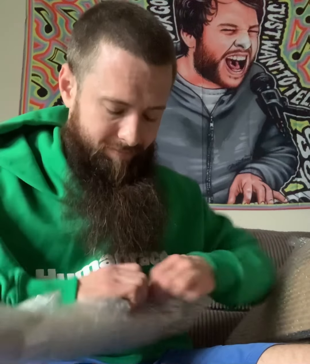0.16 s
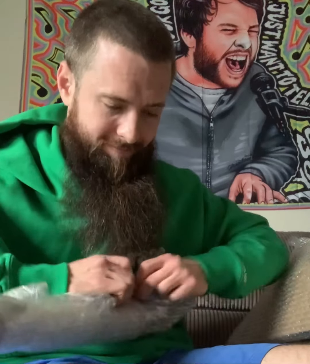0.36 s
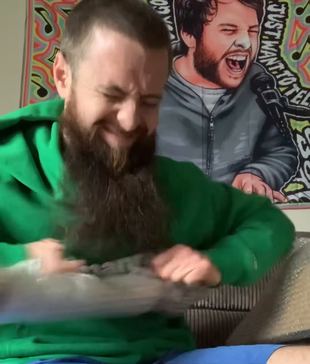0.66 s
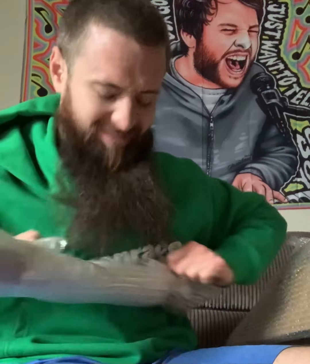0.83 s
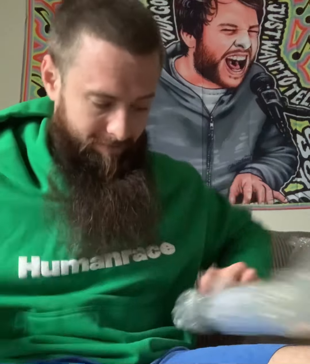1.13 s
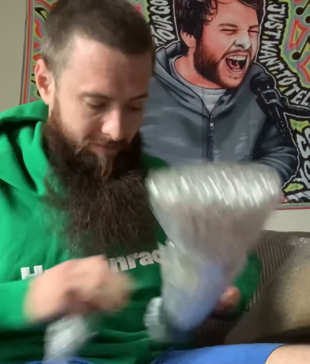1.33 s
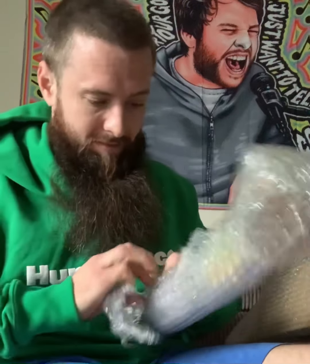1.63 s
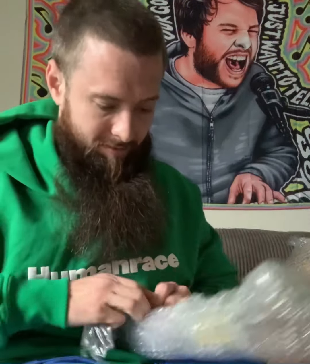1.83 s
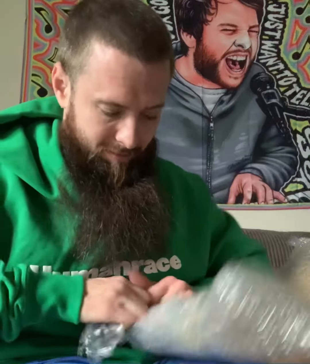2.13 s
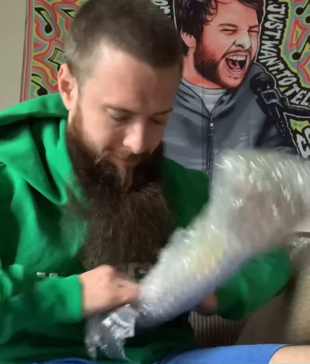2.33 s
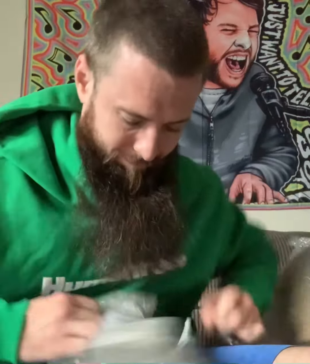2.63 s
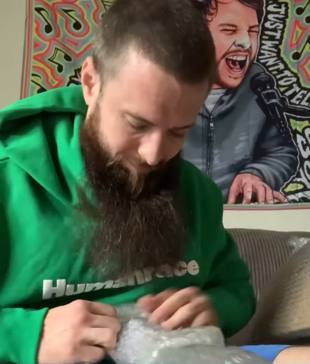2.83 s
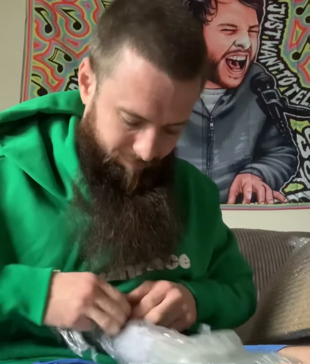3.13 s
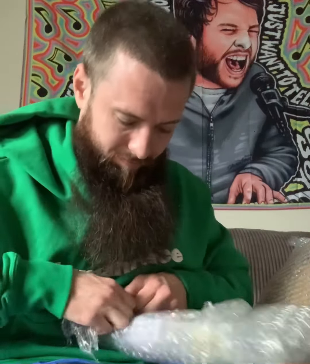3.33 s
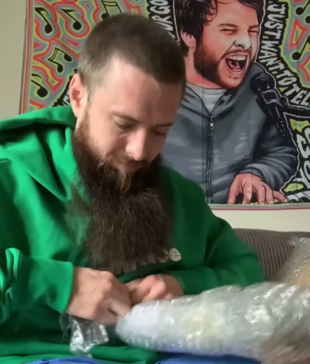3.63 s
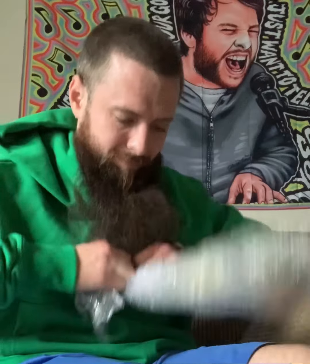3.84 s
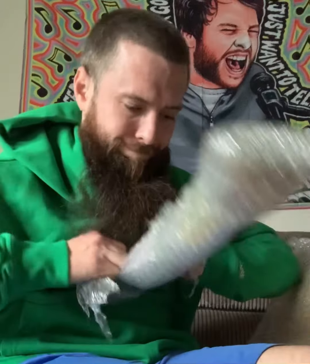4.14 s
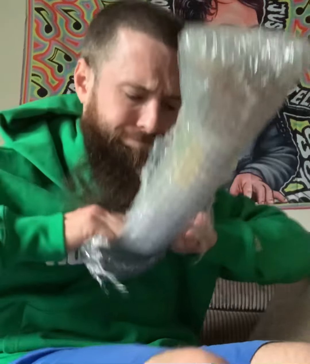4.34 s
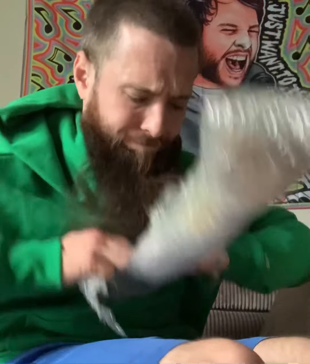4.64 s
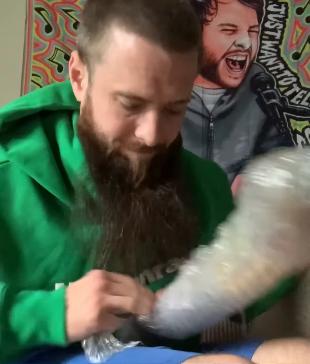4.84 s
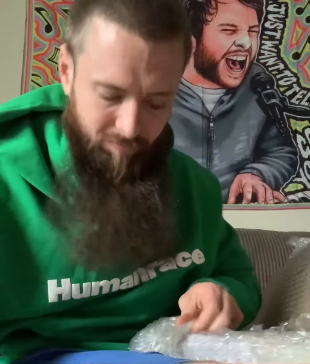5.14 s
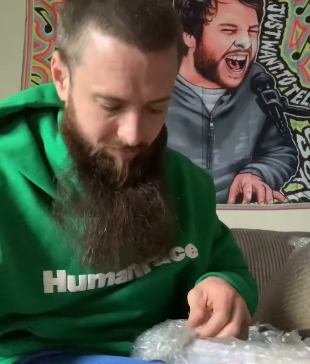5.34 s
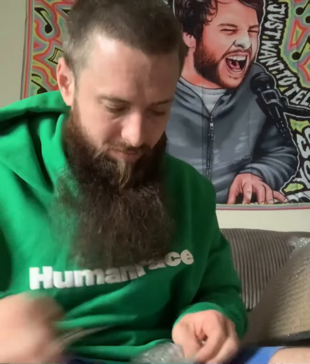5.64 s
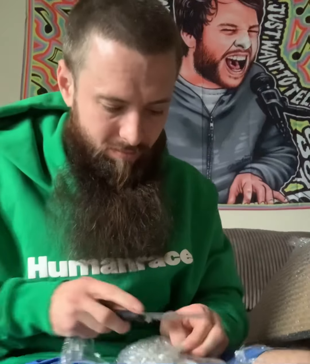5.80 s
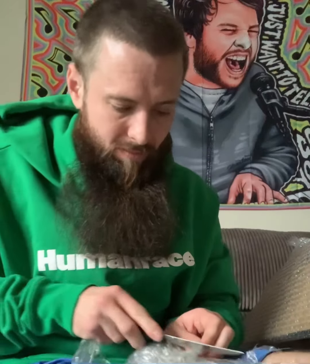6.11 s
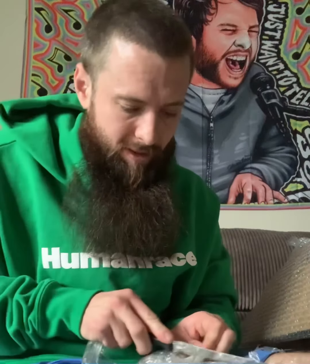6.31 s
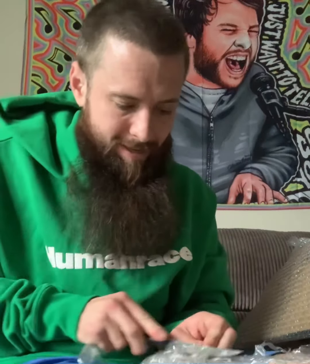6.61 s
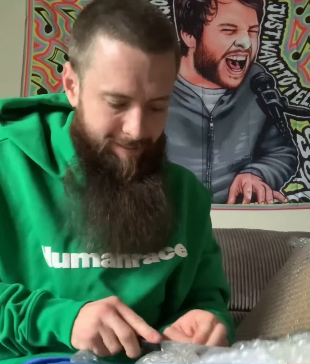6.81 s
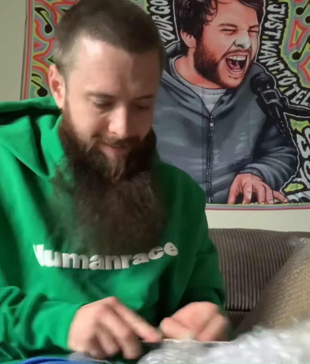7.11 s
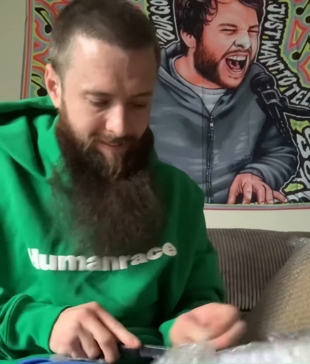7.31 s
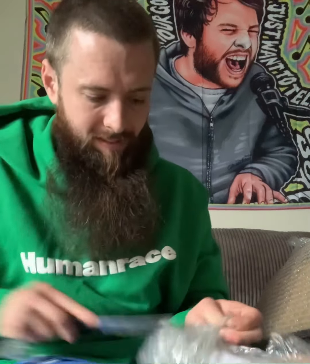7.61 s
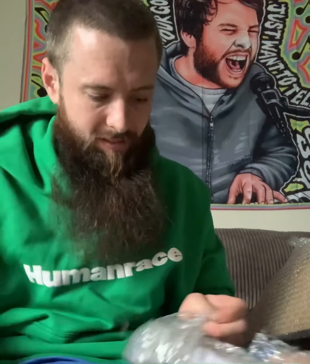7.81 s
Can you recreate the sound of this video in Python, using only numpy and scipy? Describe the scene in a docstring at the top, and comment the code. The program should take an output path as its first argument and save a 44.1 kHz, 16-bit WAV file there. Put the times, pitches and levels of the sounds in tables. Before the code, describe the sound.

Bursts of bright plastic crackling, tape squeals and pops in a small living room, a quieter lull, a hard knock, then short rasping cutting strokes.

```python
"""Bubble wrap is tugged off a parcel on a sofa in a small living room, in front of a phone's microphone.
Tape squeals as it sticks and slips, film crackles in random grains, sharp cracks are filtered noise bursts,
and hollow pops are falling chirps, from the buckling sheet or a scraping stroke. Cushions thud as sines.
A knife knocks on a table, heard as ringing modes, and saws through the wrap in short rasping strokes.
The room answers from about a metre of extra path, over a low rumble and faint hums."""
import sys
import numpy as np
from scipy import signal
from scipy.fft import rfft, irfft, next_fast_len
from scipy.io import wavfile
from scipy.ndimage import uniform_filter1d, map_coordinates

SR = 44100
rng = np.random.default_rng(int(sys.argv[2]) if len(sys.argv) > 2 else 0)


def dump(signal):
    """Clip the signal to [-1, 1] and save it as 16-bit WAV at the path in sys.argv[1]."""
    limited = np.clip(np.atleast_2d(signal).T, -1, 1)
    pcm = np.round(limited * 32767).astype(np.int16)
    wavfile.write(sys.argv[1], SR, pcm)


N = 351036  # samples
TOP_HZ = 15800  # the phone keeps nothing above this


def amp(db):
    """Decibels to gain."""
    return 10 ** (np.asarray(db) / 20)


def unit(x):
    """x scaled to rms 1."""
    return x / np.sqrt(np.mean(x ** 2) + 1e-20)


def along(points, hz):
    """(Hz, value) points read on a log axis of frequency."""
    f, v = np.transpose(points)
    return np.interp(np.log(hz + 1), np.log(f + 1), v)


def hump(hz, centre_hz, octaves):
    """A bell curve of height 1 on a log axis of frequency."""
    return np.exp(-.5 * (np.log2((hz + 1) / centre_hz) / octaves) ** 2)


def curves(rows):
    """One value per sample for each column after the time."""
    s, *cols = np.transpose(rows)
    return [np.interp(np.arange(N) / SR, s, c) for c in cols]


def wobble(rate):
    """A smooth random curve, rate knots a second."""
    knots = rng.standard_normal(int(N * rate / SR) + 4)
    return map_coordinates(knots, [np.arange(N) * rate / SR])


def filtered(x, response):
    """x times a complex response of frequency."""
    n = x.shape[-1]
    m = next_fast_len(n + SR // 8)
    return irfft(rfft(x, m) * response(np.fft.rfftfreq(m, 1 / SR)), m)[..., :n]


def coloured(x, spectrum):
    """x shaped by the given spectrum, at rms 1."""
    return unit(filtered(x, lambda hz: amp(along(spectrum, hz))))


def add(track, s, sound):
    """Mix a sound into the track from time s."""
    start = max(round(s * SR), 0)
    track[start:start + len(sound)] += sound[:N - start]


def bending(hz, lag=.0048):
    """Bending waves arrive treble first: the delay is lag (s) at 1 kHz and falls with the root of frequency."""
    return np.exp(-4j * np.pi * lag * np.sqrt(10 ** 3 * hz))


def grains(rate, spread_db, limit):
    """Impulses at random moments, rate a second: many tiny ones, a few large."""
    when, chance, sign = rng.random((int(rate * N / SR), 3)).T
    rarity = np.minimum(-np.log(1 - chance), limit)
    size = amp(spread_db * rarity) * np.sign(sign - .5)
    return np.bincount((when * N).astype(int), size, N)


# colour of the low rumble under the room: [f/Hz, density/dB per Hz]
RUMBLE_COLOUR = [(20, -38), (42, -18), (62, -3.5), (80, -0.5), (105, -7), (140, -13.5), (300, -15),
                 (1000, -28), (4000, -62), (15000, -31.5)]
# low hums that come and go: [t/s, length/s, f/Hz, level/dB]
HUMS = [(3.197, 1.05, 104.2, -57), (5.5, 2.36, 78.3, -53)]
RUMBLE_DB = -54


def background():
    """Noise makes a low rumble; sines that waver in phase and level hum faintly in it."""
    out = amp(RUMBLE_DB) * coloured(rng.standard_normal(N), RUMBLE_COLOUR)
    for s, length, hz, db in HUMS:
        t = np.arange(int(length * SR)) / SR
        tone = np.sin(2 * np.pi * hz * t + wobble(10)[:len(t)])
        hum = tone * amp(3 * wobble(7)[:len(t)])
        add(out, s, amp(db + 1.5) * unit(hum) * signal.windows.tukey(len(t)))
    return out


# rustle of the wrap as it is held and turned: [t/s, level/dB]
HANDLING = [(0.76, -40.5), (1.18, -49.5), (1.36, -44.5), (1.58, -42.5), (2.36, -43.5), (2.72, -47),
            (3.08, -45.5), (3.23, -47), (4.65, -50), (4.83, -47), (5.99, -52.5), (7.0, -45.5), (7.18, -40),
            (7.46, -38.5), (7.7, -46), (7.96, -54.5)]
# the hands grip and tug the wrap: [t/s at the hardest, length/s, film level/dB, padded sheet level/dB]
TUGS = [(0.08, 0.28, -30, -49), (0.247, 0.04, -31.5, -55), (0.377, 0.19, -37, -44), (0.56, 0.17, -26, -38),
        (0.645, 0.093, -24.5, -29), (0.869, 0.11, -30.5, -32.5), (0.997, 0.23, -41, -48.5),
        (1.652, 0.14, -41, -47), (2.043, 0.049, -31.5, -40.5), (2.108, 0.056, -33, -64),
        (2.369, 0.19, -32, -41), (2.889, 0.073, -34.5, -44), (3.005, 0.11, -40, -68),
        (3.163, 0.2, -41, -53), (3.838, 0.23, -42, -60), (4.247, 0.14, -44.5, -74),
        (4.857, 0.19, -41, -54.5), (5.078, 0.12, -43, -58), (6.276, 0.094, -46, -74),
        (6.498, 0.085, -39.5, -59), (6.745, 0.034, -36, -66), (7.52, 0.11, -29.5, -58)]
HELD_FILM_DB, HELD_SHEET_DB = 1.5, -12  # film and padded sheet, relative to the held rustle
BUILD_SHARE = 0.55  # part of a tug spent tightening
TUG_FADE_DB, TUG_SHAPE = 8.5, 2.1  # drop at both ends of a tug; roundness of its top


def effort():
    """Gain of film and padded sheet: each tug tightens and lets go, its power added to the steady handling."""
    t = np.arange(N) / SR
    held_db, = curves(HANDLING)
    power = amp([held_db + HELD_FILM_DB, held_db + HELD_SHEET_DB]) ** 2
    for s, length, film_db, sheet_db in TUGS:
        near = np.abs(t - s) < 2 * length
        before = (s - t[near]) / BUILD_SHARE
        after = (t[near] - s) / (1 - BUILD_SHARE)
        away = np.maximum(before, after) / length
        tug = amp([[film_db], [sheet_db]]) * amp(-TUG_FADE_DB * away ** TUG_SHAPE)
        power[:, near] += tug ** 2
    return np.sqrt(power)


# colour of the thin film, for crackle and sharp cracks: [f/Hz, density/dB per Hz]
FILM_COLOUR = [(200, -15), (600, -2.5), (1300, -2.5), (2100, -5.5), (3000, -1), (3900, 2), (5200, -2),
               (7200, 1), (9500, -0.5), (12000, 3.5), (15500, 0)]


def crackle(rate, spread_db, limit, variety_db=4.0):
    """Tiny creases give way as random impulses, coloured afresh from moment to moment."""
    z = signal.stft(grains(rate, spread_db, limit), nperseg=256)[2]
    facets = unit(uniform_filter1d(rng.standard_normal(z.shape), size=9, axis=0))
    varied = signal.istft(z * amp(variety_db * facets), nperseg=256)[1][:N]
    return coloured(varied, FILM_COLOUR)


# colour of the padded sheet as it flexes: [f/Hz, density/dB per Hz]
SHEET_COLOUR = [(50, -40), (150, -9), (260, 0), (480, 2), (750, -17), (1300, -8), (2500, -12), (6000, -57)]


def crinkle(film_gain, sheet_gain):
    """The film crackles in clumps as the hands work it, and the padded sheet flexes under it."""
    clumps = amp(2.77 * wobble(45))
    film = unit(crackle(rate=2100, spread_db=1.5, limit=5.1) * clumps)
    flexing = filtered(grains(rate=450, spread_db=3.5, limit=3.0), bending)
    sheet = coloured(flexing, SHEET_COLOUR)
    return amp(1.5) * film_gain * film + amp(-0.5) * sheet_gain * sheet


# tape and film squeal as they stick and slip:
# [t/s, length/s, start f/Hz, middle f/Hz, end f/Hz, level/dB before the rounded envelope, roughness 0-1]
SQUEAKS = [(0.0, 0.057, 1573, 879, 1420, -33, 0.15), (0.025, 0.041, 3013, 3463, 4210, -28, 0.55),
           (.075, 0.024, 1124, 1530, 2240, -28, 0.04), (.077, .02, 2560, 3290, 3880, -24, 0.08),
           (0.09, 0.045, 2130, 2287, 2200, -27.5, 0.02), (0.106, 0.017, 4035, 3970, 4800, -21.5, 0.2),
           (0.107, 0.032, 7400, 6480, 5680, -24, .14), (.117, 0.0147, 1540, 1676, 1520, -27.5, 0.2),
           (.121, .01, 3480, 3270, 3170, -25, .05), (1.3779, 0.0076, 3830, 3730, 3570, -25, 0),
           (4.198, .025, 3890, 4400, 5140, -41, 0.06), (7.537, 0.015, 8250, 8800, 9800, -17.5, 0.26)]


def squeaks(jitter=0.187, overtone_db=-11):
    """Stick and slip at a rate that glides along an arc; roughness shakes both pitch and level."""
    out = np.zeros(N)
    for s, length, start_hz, middle_hz, end_hz, db, rough in SQUEAKS:
        u = np.linspace(0, 1, int(length * SR))
        arc = np.polyval(np.polyfit([0, .5, 1], [start_hz, middle_hz, end_hz], 2), u)
        shake = unit(uniform_filter1d(rng.standard_normal(SR // 10), size=14))[:len(u)]
        unrest = np.sqrt(abs(rough)) * shake
        phase = 2 * np.pi * np.cumsum(arc * (1 + jitter * unrest)) / SR
        overtone = amp(overtone_db) * np.sin(2 * phase) * (2 * end_hz < TOP_HZ)
        tone = np.sin(phase) + overtone
        envelope = np.sqrt(np.abs(np.sin(np.pi * u)))
        add(out, s, amp(db) * unit(tone * (1 + unrest)) * envelope)
    return out


# lowest and highest ring of the small creases: [f/Hz]
TICK_HZ = (2200, 9000)
TICKS_PER_S, TICK_DB = 22, 5  # how often; level over the film's gain


def ticks(film_gain):
    """Small creases give way by chance, as strong as the film is worked: rows [t/s, level/dB, ring f/Hz]."""
    when, pitch = rng.random((int(TICKS_PER_S * N / SR), 2)).T
    db = 20 * np.log10(film_gain[(when * N).astype(int)]) + TICK_DB
    low_hz, high_hz = TICK_HZ
    return np.c_[when * N / SR, db, low_hz * (high_hz / low_hz) ** pitch]


# sharp cracks: creases of the film, from 5.36 s also the knife's knock, ticks and catches:
# [t/s, nominal peak level/dB, ring f/Hz]
CRACKS = [(.334, -17.5, 3450), (.405, -20.5, 3670), (.441, -21, 9000), (.4545, -8.5, 6840),
          (.4555, -17.5, 3120), (.4708, -16, 3630), (.488, -17.5, 4300), (.505, -14, 4450),
          (.512, -20, 7500), (.5618, -9.5, 3280), (.565, -10, 8850), (.5715, -13.5, 2750),
          (.647, -12, 1290), (.666, -9.5, 1300), (.8051, -9.5, 7200), (.8084, -12, 3400),
          (.8607, -13, 2550), (.898, -20, 7100), (1.0061, -23.5, 9600), (1.383, -16.5, 1950),
          (1.394, -21, 3040), (1.5694, -22.5, 3060), (1.723, -23, 3600), (1.7738, -11.5, 3630),
          (1.7825, -34, 3750), (1.7905, -19.5, 3500), (2.0346, -23, 8000), (2.054, -19.5, 9300),
          (2.2444, -23.5, 7200), (2.3105, -16.5, 2940), (2.334, -14, 4100), (2.357, -15, 4270),
          (2.368, -20, 3600), (2.3815, -13.5, 6300), (2.406, -19.5, 4320), (2.5012, -27.5, 3100),
          (2.6781, -14.5, 4100), (2.8453, -25, 1450), (2.8642, -19, 1350), (2.866, -22, 3400),
          (2.883, -23.5, 3280), (3.201, -22.5, 9200), (4.2803, -29, 3550), (4.7037, -26, 7600),
          (4.873, -27.5, 4100), (4.9013, -30, 7030), (5.3605, -24.5, 3180), (5.6401, -28.5, 4530),
          (6.652, -28, 4000), (6.8059, -28, 4100), (6.9696, -22.5, 3940), (6.9871, -20.5, 3920),
          (7.2015, -26, 3590), (7.2545, -21, 3320), (7.4261, -16, 3870), (7.4815, -18, 4230),
          (7.498, -19, 8300), (7.507, -18, 9000)]
RING_DB, RING_OCTAVES = 11, .2  # lift and width of a crack's ring
RING_OVERTONE = .35  # share of that lift an octave higher
CREEP_DB, CREEP_S, CRACK_S = -20, .025, .008  # creep level; s per 60 dB of its rise; t60 of the crack


def cracks(rows, variety_db=2.5, flutter_db=-17, flutter_t60=0.068):
    """Noise creeps up, cracks, then flutters briefly around its own pitch, as a loaded crease gives way."""
    out, t = np.zeros(N), np.arange(-SR // 50, SR // 20) / SR
    after = np.maximum(t, 0)
    creep = amp(CREEP_DB - 60 * np.abs(t) / CREEP_S)
    crack = amp(-60 * after / CRACK_S)
    flutter = amp(flutter_db - 60 * after / flutter_t60)
    shape = np.where(t < 0, creep, crack + flutter)
    for s, db, ring_hz in rows:
        # every crack has its own uneven colour
        facets = np.c_[np.geomspace(500, TOP_HZ, num=20), rng.normal(0, variety_db, size=20)]

        def colour(hz):
            """Gain of this crack: the film, its facets and its ring."""
            ring = hump(hz, ring_hz, RING_OCTAVES)
            octave = RING_OVERTONE * hump(hz, 2 * ring_hz, RING_OCTAVES)
            return amp(along(FILM_COLOUR, hz) + along(facets, hz) + RING_DB * (ring + octave))

        burst = filtered(rng.standard_normal(len(t)) * shape, colour)
        add(out, s + t[0] + .0008, amp(db - 17.5) * unit(burst))
    return out


# hollow pops: the padded sheet buckles, or a scraping stroke catches in it:
# [t/s, nominal peak level/dB, f/Hz]
POPS = [(.126, -28.5, 460), (.523, -18, 440), (.561, -21.5, 374), (.567, -14, 325), (.63, -18.5, 440),
        (0.6638, -17.5, 467), (0.8056, -18.5, 546), (.859, -12, 394), (1.004, -32, 376), (1.46, -27.5, 410),
        (1.789, -28.5, 396), (2.097, -19, 335), (2.3311, -14.5, 352), (2.3793, -15, 270),
        (2.402, -24.5, 320), (2.675, -32, 440), (2.861, -29.5, 820), (3.199, -31, 380), (3.685, -29, 720),
        (5.11, -35.5, 465), (6.5, -33, 330), (6.9686, -25.5, 490), (7.2, -25.5, 760), (7.623, -26, 420)]
# colour of a pop pitched at POP_HZ: [f/Hz, density/dB per Hz]
POP_COLOUR = [(50, -27), (90, -3), (150, -12.5), (230, 1), (500, 0), (800, -9), (1300, -10.5), (2200, -22),
              (6000, -35)]
POP_HZ = 400


def pops(rattle_db=-28, rattle_t60=0.041):
    """One push and a short rattle, spread by the padded sheet into a quick falling chirp."""
    out, t = np.zeros(N), np.arange(SR // 10) / SR
    for s, db, pop_hz in POPS:
        rattle = amp(rattle_db - 60 * t / rattle_t60) * rng.standard_normal(len(t))
        push = (t == 0) + rattle
        # the whole colour slides to the pitch of this pop
        sheet = lambda hz: amp(along(POP_COLOUR, hz * POP_HZ / pop_hz)) * bending(hz)
        add(out, s, amp(db - 14.5) * unit(filtered(push, sheet)))
    return out


# arms and parcel bump on the cushions: [t/s, nominal peak level/dB, thud f/Hz]
BUMPS = [(0.868, -30.5, 83), (1.079, -31, 84), (2.387, -28.5, 106), (3.236, -32.5, 99), (5.151, -24.5, 94),
         (5.237, -25, 155), (5.284, -31.5, 117), (7.682, -31, 111)]


def bumps():
    """The cushions answer each bump with a dull thud, a sine with a soft onset and a quick decay."""
    out, t = np.zeros(N), np.arange(SR // 3) / SR
    envelope = amp(-60 * t / 0.069) * (1 - np.exp(-t / 0.004))
    for s, db, thud_hz in BUMPS:
        add(out, s, amp(db + 5.5) * np.sin(2 * np.pi * thud_hz * t) * envelope)
    return out


# strokes that scrape across the wrap: [t/s, length/s, nominal level/dB, rasp relative to it/dB]
STROKES = [(3.675, 0.077, -39.5, -8), (6.497, 0.059, -42, -8), (6.624, 0.056, -41.5, -2),
           (6.768, 0.04, -41, -11), (6.964, 0.055, -33, -1.5), (7.075, 0.077, -37, 0),
           (7.196, 0.088, -33.5, 0), (7.319, .056, -36.5, -5), (7.423, 0.061, -35, -2.5),
           (7.479, 0.081, -36.5, -8)]
# hollow colour of the scraped air cells, also of the knife's clatter: [f/Hz, density/dB per Hz]
SCRAPE_COLOUR = [(70, -21.5), (260, -3), (500, 0.5), (850, 4), (1350, -2.5), (2200, -16), (4000, -13),
                 (9000, -32)]
BLADE_HZ, BLADE_OCTAVES, BLADE_DB = 4060, 0.16, 3  # the blade rings in the rasp: pitch, width, lift
CATCHES_PER_S, CATCH_DB = 330, 2.5  # the edge catches and slips unevenly: knots a second, depth


def scrapes(rise=0.0034, fall_power=0.41, bite=0.51):
    """Strokes catch on the film many times: air cells sound hollow; in mid-stroke the edge bites brightly."""
    body, rasp = np.zeros(N), np.zeros(N)
    for s, length, db, rasp_db in STROKES:
        t = np.arange(int(length * SR)) / SR
        fall = (1 - (t / length) ** 2) ** fall_power
        pressure = amp(db + 3.0) * (1 - np.exp(-t / rise)) * fall
        add(body, s, pressure)
        add(rasp, s, pressure * amp(rasp_db + 3.5) * np.abs(np.sin(np.pi * t / length)) ** bite)
    catches = unit(amp(CATCH_DB * wobble(CATCHES_PER_S)))
    cell_hits = catches * grains(rate=600, spread_db=1.5, limit=3.5)
    cells = coloured(filtered(cell_hits, bending), SCRAPE_COLOUR)
    blade = lambda hz: amp(BLADE_DB * hump(hz, BLADE_HZ, BLADE_OCTAVES))
    edge = unit(filtered(catches * crackle(rate=1600, spread_db=2.5, limit=4.6), blade))
    return body * cells + rasp * edge


# the knife knocks on a table: [t/s, nominal peak level/dB, hardness/dB per octave]
KNOCKS = [(5.231, -24, 4.5), (5.279, -32.5, -1.5), (5.349, -33, 5), (5.3609, -12, 0)]
# modes of the table top, before hardness tilts them: [f/Hz, level/dB, t60/s]
TABLE_MODES = [(270, 3.5, .095), (563, 5, .09), (865, 1.5, 0.072), (1040, -6, 0.11), (1350, -8, .07),
               (1640, 0, 0.053), (1787, -2, .045), (1990, -5, .035)]


def knocks(lead=.002):
    """The knife knocks and chatters on the table top; a harder contact favours the higher modes."""
    out, t = np.zeros(N), np.arange(SR // 3) / SR
    for s, db, hardness in KNOCKS:
        ring = np.zeros(len(t))
        for hz, level, t60 in TABLE_MODES:
            tilt = hardness * np.log2(hz / 1000)
            decay = amp(level + tilt + 2 * wobble(110)[:len(t)] - 60 * t / t60)
            ring += decay * np.sin(2 * np.pi * hz * t + .45 * wobble(110)[:len(t)])
        clatter = coloured(rng.standard_normal(len(t)), SCRAPE_COLOUR) * amp(3.5 - 60 * t / 0.052)
        add(out, s - lead, amp(db - 13.5) * filtered(ring + clatter, bending))
    return out


# how long the living room rings: [f/Hz, t60/s]
ROOM_T60 = [(100, 0.55), (400, 0.27), (1000, 0.3), (3000, 0.16), (8000, 0.21), (16000, 0.05)]
# how loudly it answers: [f/Hz, level/dB]
ROOM_LEVEL = [(100, -1.5), (350, -4.5), (1000, -6.5), (3000, -8), (8000, -5.5), (15000, -13.5)]


def room(x, gap=.003):
    """Mid and side of the room's answer: decaying random reflections at each frequency's own t60."""
    out, hop = np.zeros((2, N + SR)), SR // 12
    x = np.pad(x, (round(gap * SR), 0))  # 3 ms, about a metre of extra path
    # the random reflections are drawn afresh 12 times a second, so no one colour stands out
    for start in range(0, N, hop):
        hz, t, z = signal.stft(rng.standard_normal((2, SR // 3)), SR, nperseg=256)
        fade = amp(-60 * t / along(ROOM_T60, hz)[:, None])
        energy = np.mean(fade ** 2, axis=1, keepdims=True) * SR / 3
        fade *= amp(along(ROOM_LEVEL, hz))[:, None] / np.sqrt(energy)
        reflections = signal.istft(z * fade, SR, nperseg=256)[1]
        wet = signal.fftconvolve(x[None, start:start + hop], reflections, axes=1)
        out[:, start:start + wet.shape[1]] += wet
    return out[:, :N]


# stereo width of the room's answer: [f/Hz, side gain/dB]
ROOM_WIDTH = [(350, -56), (520, -12.5), (680, 0.5), (2600, 6.5), (4500, 0.5), (6800, -9), (10000, 6),
              (14000, -38)]
SHARP_ROOM_DB = -6  # sharp cracks send less to the room and sound drier


def scene():
    """The wrap in front of the microphone, the room around it and its rumble."""
    film_gain, sheet_gain = effort()
    handling = crinkle(film_gain, sheet_gain) + squeaks() + pops() + bumps() + scrapes() + knocks()
    sharp = cracks(ticks(film_gain)) + cracks(CRACKS)
    wet_mid, wet_side = room(handling + amp(SHARP_ROOM_DB) * sharp)
    mid = amp(-1.0) * (handling + sharp) + wet_mid + background()
    side = filtered(wet_side, lambda hz: amp(along(ROOM_WIDTH, hz)))
    return np.array([mid + side, mid - side])


# phase between the phone's two microphone ports: [f/Hz, lead of the left/rad]
PORT_PHASE = [(900, 0), (1800, 1.15), (4000, 0.5), (5300, 1.5), (6600, 0.44), (8500, 0.75), (10000, -0.94),
              (12500, -3)]


def record(dry):
    """The phone's two ports drift out of phase towards the treble; nothing is kept above its band limit."""
    left_right = np.array([[1], [-1]])
    ports = filtered(dry, lambda hz: np.exp(.5j * along(PORT_PHASE, hz) * left_right))
    return filtered(ports, lambda hz: hz < TOP_HZ)


dry = scene()
out = record(dry)
dump(out)
```